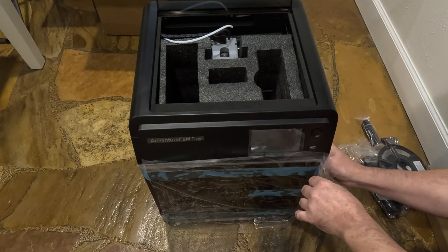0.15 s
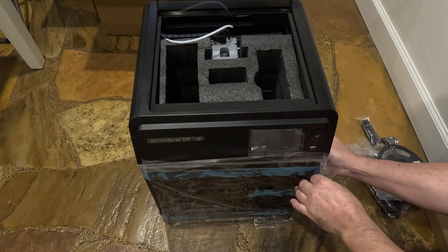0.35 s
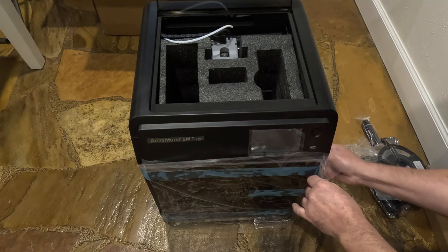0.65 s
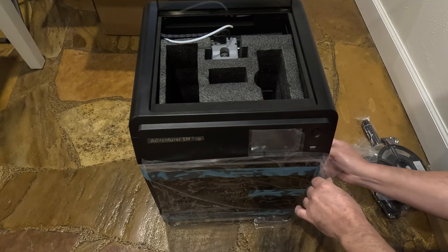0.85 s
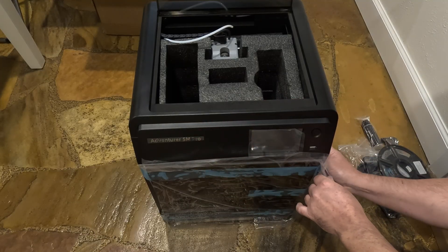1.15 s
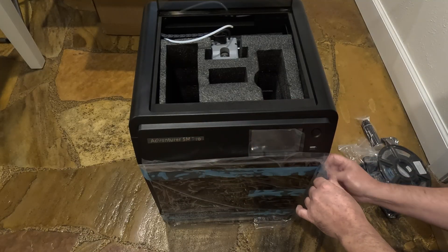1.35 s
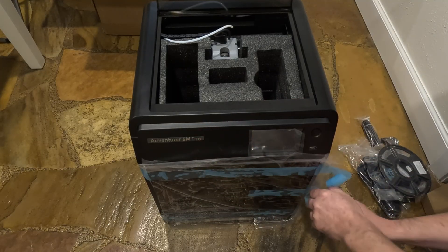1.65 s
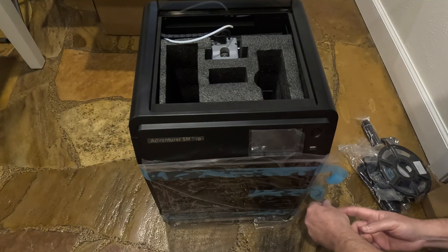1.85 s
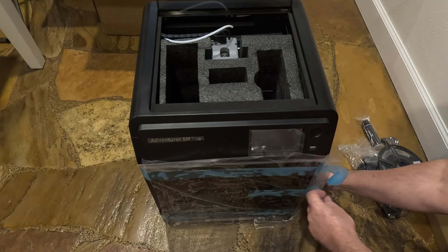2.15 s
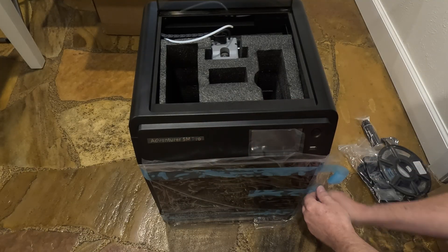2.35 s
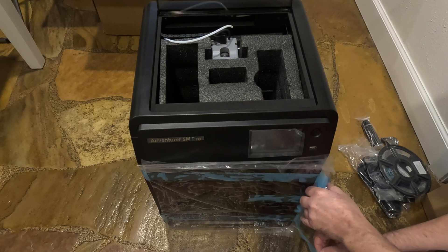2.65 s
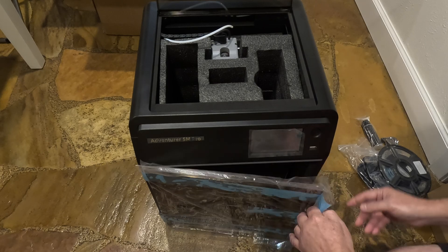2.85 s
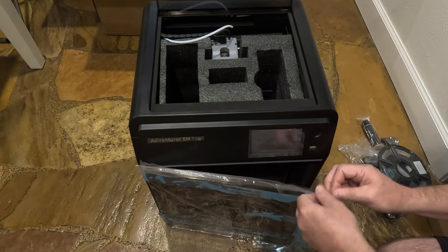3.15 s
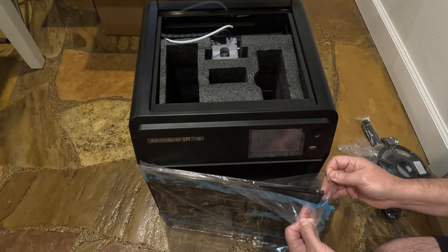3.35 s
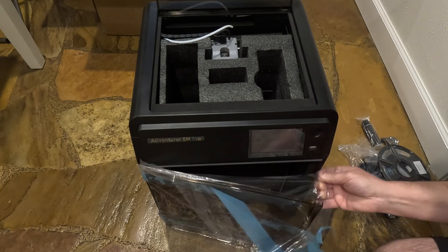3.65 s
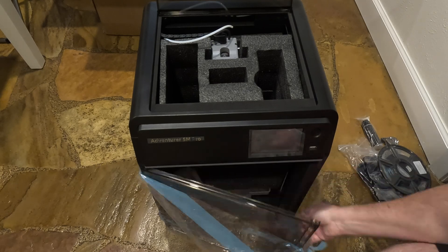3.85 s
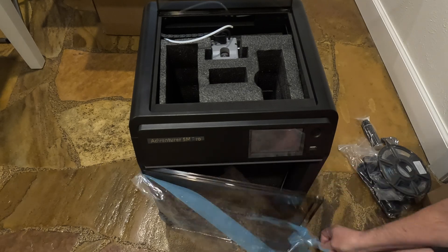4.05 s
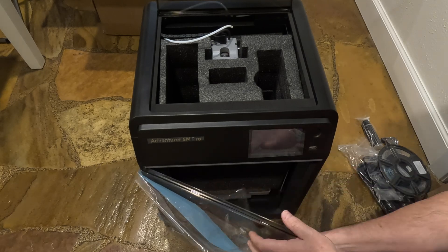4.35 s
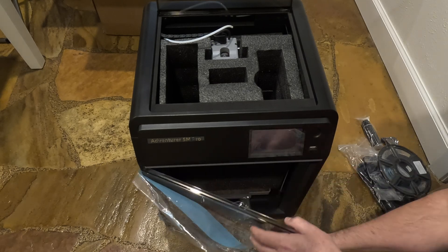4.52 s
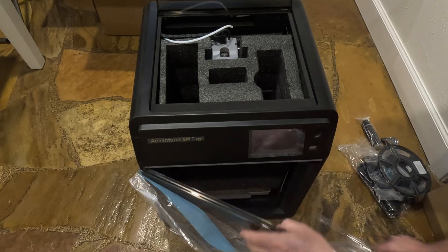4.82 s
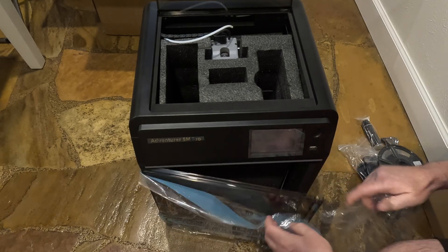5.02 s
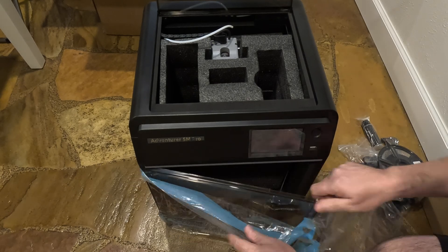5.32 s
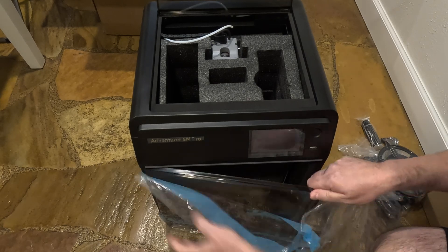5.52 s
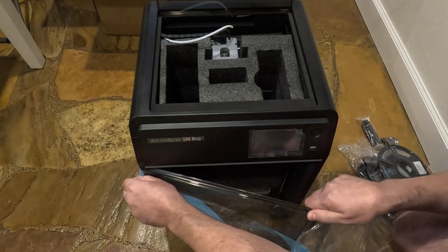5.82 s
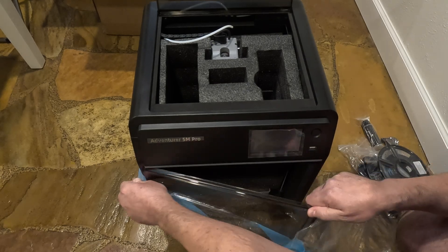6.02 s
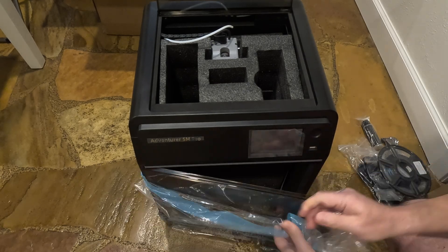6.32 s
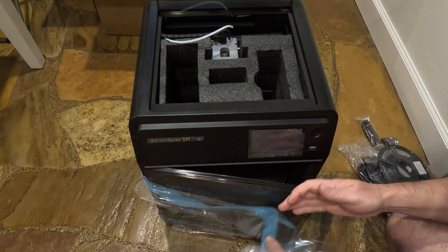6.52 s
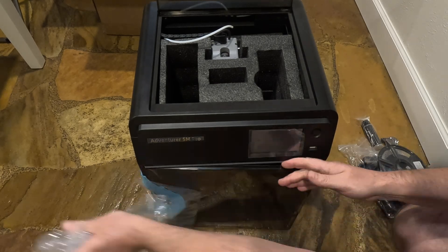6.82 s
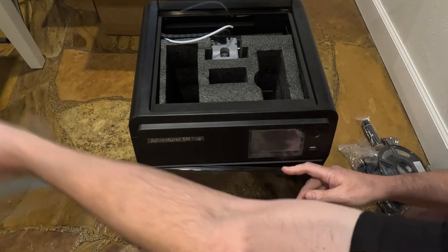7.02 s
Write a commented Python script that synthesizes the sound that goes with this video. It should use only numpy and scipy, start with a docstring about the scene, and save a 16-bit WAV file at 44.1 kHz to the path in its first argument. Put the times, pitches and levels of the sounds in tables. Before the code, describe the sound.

Crinkly plastic sheet crackles and snaps as hands tug it free from a hollow box indoors, quiet picking growing into loud rustling pulls.

```python
"""Clear plastic film, picked at its tape by two hands, is pulled off a hollow printer cabinet on a stone floor.
Film: dense small crease rings and fine hiss follow the pull; rips are filtered bursts of the same rustle.
Snaps are sharp filtered edges with flutter; two chirps are short tones.
The cabinet rings at its modes when bumped by fingers or shaken by the film.
Close reflections and faint room rumble surround it, heard by two close microphone ports."""
import sys
import numpy as np
from scipy import signal
from scipy.fft import rfft, irfft
from scipy.io import wavfile
from scipy.ndimage import uniform_filter1d

SR = 44100
rng = np.random.default_rng(int(sys.argv[2]) if len(sys.argv) > 2 else 0)


def generate_wav(sig):
    """Save sig (samples, or channels by samples) to the path in sys.argv[1] as 16-bit PCM at SR."""
    pcm = np.round(np.clip(np.atleast_2d(sig).T, -1, 1) * 32767).astype(np.int16)
    wavfile.write(sys.argv[1], SR, pcm)


N = 316544


def gain_of(db):
    """Amplitude factor of a level in dB."""
    return 10 ** (np.asarray(db) / 20)


def evened(x):
    """Scale to an RMS of one."""
    return x / np.sqrt(np.mean(x ** 2) + 1e-20)


def read(points, hz):
    """Interpolate a spectrum table over log frequency."""
    f, value = np.transpose(points)
    return np.interp(np.log(hz + 1), np.log(f + 1), value)


def add(mix, s, sound):
    """Mix a sound in place from s seconds on."""
    part = mix[round(s * SR):][:len(sound)]
    part += sound[:len(part)]


def smoothed(x, length):
    """Two moving averages, length in samples."""
    return uniform_filter1d(uniform_filter1d(x, length), length)


def high_pass(x, hz, order):
    """Butterworth high-pass."""
    return signal.sosfilt(signal.butter(order, hz, "high", fs=SR, output="sos"), x)


def colour(x, points, size=2048):
    """Causal filter of unit energy: the phase follows from the log gain."""
    db = np.maximum(read(points, abs(np.fft.fftfreq(size, 1 / SR))), -100)
    log_gain = db * np.log(10) / 20
    taps = np.fft.ifft(np.exp(np.conj(signal.hilbert(log_gain)))).real[:size // 2]
    return signal.oaconvolve(x, taps / np.linalg.norm(taps))[:len(x)]


def control(table, index):
    """One column of a curve at every sample."""
    rows = np.array(table)
    return np.interp(np.arange(N) / SR, rows[:, 0], rows[:, index])


def band(x, hz, width):
    """A broad two-pole hump around hz, width in parts of hz."""
    return signal.lfilter(*signal.iirpeak(np.clip(hz, 300, 12000), 1 / width, SR), x)


# Steady pull on the film, slack while picking, then hauled in strokes.
# Each row: time in seconds, rustle level in dB.
PULL_CURVE = [(0, -66), (1.25, -72.5), (2.13, -72), (2.56, -56.5), (2.92, -47), (3.13, -53.5), (3.18, -68),
              (3.22, -48.5), (3.84, -40.5), (4.15, -44.5), (4.37, -60.5), (4.46, -35), (4.62, -45.5),
              (4.68, -30.5), (4.85, -31.5), (4.89, -47), (5.55, -42.5), (5.62, -50.5), (5.68, -44.5),
              (5.98, -39), (6.23, -48.5), (6.3, -36.5), (6.69, -35), (6.71, -27), (6.96, -29.5),
              (7.04, -40), (7.18, -27)]
# The freed area grows from a tight corner to a loose sheet.
# Each row: time in seconds, thinness of the rustle (0-1), cabinet brightness in dB per octave,
# share of the pull that shakes the cabinet in dB.
SHEET_CURVE = [(0, 0.3, -0.2, -1), (2.2, 0.18, -5, -3.5), (3.2, 0, -1, -15), (7.18, 0, 0.6, -18.5)]
# Patches of glue or tape ripping free.
# Each row: start in seconds, length in seconds, level in dB, brightest Hz, shaking of the cabinet in dB.
RIP_EVENTS = [(0.0, 0.036, -46, 5000, -72), (0.059, 0.032, -31.5, 4570, -47.5),
              (0.156, 0.038, -41, 1000.0, -44), (0.258, 0.029, -47, 990, -42.5),
              (0.375, 0.01, -63, 900.0, -38), (0.419, 0.025, -36.5, 1180, -42),
              (0.509, 0.025, -55, 1000.0, -46.5), (0.572, 0.027, -52.5, 3000.0, -50),
              (0.638, 0.012, -39, 3000, -44), (0.654, 0.02, -28, 5900.0, -30),
              (0.689, 0.071, -56, 900, -45.5), (0.724, 0.03, -28, 5850, -45),
              (0.764, 0.042, -51, 4000, -74), (0.815, 0.014, -38.5, 7600.0, -70),
              (0.833, 0.027, -44, 3000, -70), (0.906, 0.041, -45.5, 4080, -81),
              (1.002, 0.015, -56, 900.0, -44.5), (1.066, 0.022, -50, 5000.0, -53),
              (1.101, 0.031, -46.5, 5000, -64), (1.137, 0.025, -38, 9000.0, -33.5),
              (1.265, 0.023, -47, 880, -45), (1.303, 0.078, -48.5, 4000, -45),
              (1.363, 0.025, -41, 7000.0, -44), (1.4, 0.048, -35.5, 5800.0, -46),
              (1.523, 0.041, -34.5, 2100, -37), (1.568, 0.046, -43, 4000, -64),
              (1.616, 0.012, -33.5, 5870, -39.5), (1.655, 0.03, -38, 4300, -37),
              (1.737, 0.04, -55.5, 4000, -59), (1.784, 0.027, -45.5, 3230, -52),
              (1.82, 0.062, -54.5, 6000, -62), (1.881, 0.011, -39, 2700.0, -43.5),
              (1.895, 0.048, -53.5, 4000, -69), (1.968, 0.025, -52, 6400.0, -78),
              (2.061, 0.02, -53, 1300.0, -57), (2.237, 0.012, -43.5, 6500.0, -38.5),
              (2.255, 0.045, -66, 900, -53), (2.285, 0.092, -60, 700.0, -40),
              (2.342, 0.037, -56, 3000, -55), (2.392, 0.025, -25, 5600.0, -36),
              (2.491, 0.019, -28, 4930, -40), (2.517, 0.024, -45.5, 4000, -44.5),
              (2.585, 0.044, -35.5, 3020, -45.5), (2.667, 0.076, -40.5, 3900, -60),
              (2.778, 0.022, -41, 1320, -71), (2.826, 0.02, -37.5, 3700.0, -67),
              (2.858, 0.049, -34, 2940, -42), (2.919, 0.034, -35.5, 3280, -47),
              (3.01, 0.076, -43, 3420, -54), (3.087, 0.018, -41, 6200.0, -48),
              (3.212, 0.018, -35, 3600.0, -62), (3.244, 0.061, -32, 3950, -51),
              (3.324, 0.089, -34.5, 2970, -46.5), (3.437, 0.026, -34, 7560, -51),
              (3.476, 0.03, -32.5, 7000.0, -54), (3.518, 0.023, -32, 7000.0, -51),
              (3.559, 0.047, -30, 3150, -53), (3.612, 0.044, -23, 3240, -37.5),
              (3.725, 0.039, -28.5, 3520, -43), (3.781, 0.044, -24.5, 5270, -44),
              (3.839, 0.075, -27, 3330, -42.5), (3.935, 0.032, -35.5, 5300.0, -54),
              (3.991, 0.018, -31.5, 2360, -40), (4.057, 0.02, -27, 4070, -41.5),
              (4.129, 0.026, -43, 3100.0, -64), (4.19, 0.032, -40, 3380, -49.5),
              (4.307, 0.031, -49.5, 3170, -65), (4.512, 0.074, -31.5, 3200, -51),
              (4.723, 0.06, -23, 3260, -42), (4.905, 0.043, -38, 1020, -61), (4.975, 0.076, -34, 1940, -55),
              (5.064, 0.031, -32.5, 2180, -54), (5.118, 0.067, -38, 3000, -48.5),
              (5.173, 0.027, -33, 1400, -40), (5.257, 0.053, -36, 3230, -44),
              (5.379, 0.053, -31, 2780, -46.5), (5.471, 0.058, -31.5, 3300.0, -43.5),
              (5.523, 0.044, -39.5, 2940, -48), (5.642, 0.044, -37.5, 1880, -53),
              (5.694, 0.045, -34.5, 3140, -55), (5.801, 0.038, -33.5, 3380, -50),
              (5.885, 0.0092, -40, 1090, -40), (5.971, 0.065, -28.5, 3480, -45.5),
              (6.119, 0.014, -33.5, 2700.0, -57), (6.179, 0.031, -32.5, 1220, -49),
              (6.288, 0.013, -46, 4000, -60), (6.466, 0.028, -25, 1200.0, -46),
              (6.611, 0.051, -29.5, 2820, -46), (7.054, 0.029, -20.5, 4470, -38),
              (7.09, 0.025, -30, 4500, -46), (7.168, 0.028, -23.5, 2000.0, -32)]
DULL_DB_PER_OCTAVE = 2  # a low, slack patch rips with less of the broad crackle


def film(width=2.43, broad_db=-4):
    """The rustle follows the pull; every rip is a burst of it, brightest where the free patch rings."""
    rustle = creases()
    thinness = np.clip(control(SHEET_CURVE, index=1), 0, 1)
    rustle = rustle - thinness * band(rustle, 2750, 1.0)  # a small patch radiates little mid range
    out = rustle * gain_of(control(PULL_CURVE, index=1))
    for s, length_s, db, hz, _ in RIP_EVENTS:
        shape = surge(length_s)
        at = round(s * SR) + 5000 + np.arange(len(shape))
        piece = rustle.take(at, 1, mode="wrap")
        crackle_db = broad_db + DULL_DB_PER_OCTAVE * np.log2(hz / 4000)
        ringing = band(band(piece, hz, width), hz, width)
        piece = evened(ringing) + gain_of(crackle_db) * evened(piece)
        piece /= np.sqrt(np.mean((shape * piece) ** 2) / np.mean(shape ** 2))
        for port in range(len(out)):
            add(out[port], s, gain_of(db) * shape * piece[port])
    return out


SETTLE_DB, SETTLE_T60_S = -14, 0.18  # after each rip the film settles with a fading rustle


def surge(length_s, rise=0.28, fall=0.49):
    """Quick swell, plateau, rounded end (rise, fall in parts of the length), then the film settling."""
    shortest_s = max(length_s, .005)
    t = np.arange(round((3 * shortest_s + .2) * SR)) / SR
    along = t / shortest_s
    end = np.exp(-np.maximum(along - .6, 0) ** 2 / fall ** 2)
    settling = gain_of(SETTLE_DB - 60 * np.maximum(t - length_s, 0) / SETTLE_T60_S)
    return (1 - np.exp(-along / rise)) * np.maximum(end, settling)


# Colour of the film at the microphone. Each row: frequency in Hz, density in dB per Hz.
FILM_COLOUR = [(290, -12), (500, -7.5), (853, -6), (1090, -2), (1210, -3), (1840, -5), (2450, -5.5),
               (2750, -4), (3000, -4), (7560, -5.5), (12200, -22), (15800, -42)]
# Very high hiss, independent in the two ports, its level changing over time.
# Each row: time in seconds, level in dB on the scale of hiss_db.
HIGH_HISS_CURVE = [(0, -1), (0.7, -6), (1.2, 3), (1.9, 2), (2.4, -7), (3.2, -5), (3.8, 5), (4.3, -12),
                   (5.6, -12), (6.1, 0.5), (6.8, 1.5), (7.18, -11)]
HIGH_HISS_HZ = 9800
SMOOTH_FROM_DB, SMOOTH_PER_DB = -33.5, 0.3  # a hard pull peels evenly: above this the clumps flatten


def creases(per_s=4200, spread_db=3.5, clump_db=4.0, hiss_db=-9, count=24):
    """Many tiny buckles, each a short damped ring of its own pitch and place; they come in clumps."""
    clumps = evened(smoothed(rng.standard_normal(N), 150))
    hard_db = np.maximum(control(PULL_CURVE, index=1) - SMOOTH_FROM_DB, 0)
    clump_level_db = clump_db * clumps * np.clip(1 - SMOOTH_PER_DB * hard_db, 0, 1)
    size = gain_of(spread_db * np.minimum(rng.exponential(1, N), 4) + clump_level_db)
    size *= rng.choice([-1., 1.], N) * (rng.random(N) < per_s / SR)
    kind = rng.integers(0, count, N)
    t, out = np.arange(400) / SR, np.zeros((2, N))
    for k, hz in enumerate(np.geomspace(600, 13000, count)):
        ring = np.sin(2 * np.pi * hz * t) * np.exp(-t * hz / 2.2)
        rung = signal.oaconvolve(size * (kind == k), ring * np.sqrt(hz) / np.linalg.norm(ring))[:N]
        out += rung * gain_of(rng.standard_normal() * np.array([[1], [-1]]))
    sliding = gain_of(hiss_db + clump_level_db) * rng.standard_normal(N)
    high_hiss = high_pass(rng.standard_normal((2, N)), HIGH_HISS_HZ, order=4)
    sliding = sliding + gain_of(control(HIGH_HISS_CURVE, index=1) + clump_level_db) * high_hiss
    return evened(np.array([colour(port, FILM_COLOUR) for port in evened(out) + sliding]))


# Single creases snapping through. Each row: time in seconds, peak in dB before port spread, brightest Hz.
SNAP_EVENTS = [(0.0489, -16, 6000), (0.073, -15, 6400), (0.18, -24.5, 7000), (0.248, -46, 8000),
               (0.295, -33.5, 6000), (0.4262, -22.5, 9000), (0.4385, -18, 1180), (0.6446, -13, 5960),
               (0.7299, -13, 6500.0), (0.8165, -22, 7800), (0.8385, -28, 4000), (0.849, -30, 3000),
               (1.0567, -21.5, 4770), (1.1569, -13.5, 9400), (1.2846, -27.5, 7800), (1.3813, -13.5, 6900),
               (1.442, -22, 6600.0), (1.529, -17, 4000.0), (1.552, -22, 2980), (1.621, -28, 4960),
               (1.795, -34, 5000), (1.886, -28, 3000), (2.2404, -22, 7700.0), (2.351, -34, 2500),
               (2.4025, -14, 5870), (2.4625, -25.5, 4500.0), (2.4957, -19, 4800.0), (2.5925, -10, 2740),
               (2.6631, -27, 2700), (2.7113, -23, 2780), (2.729, -20, 4230), (2.7529, -21.5, 6800.0),
               (3.0552, -17, 6700.0), (3.0943, -13, 6250), (3.138, -22, 4460), (3.1956, -27.5, 4200.0),
               (3.2555, -12.5, 3930), (3.3493, -17, 3220), (3.3958, -14, 6860), (3.4998, -19.5, 1320),
               (3.5275, -15, 7400), (3.541, -18, 5090), (3.5502, -13, 5200.0), (3.575, -14, 3020),
               (3.5912, -14.5, 2600.0), (3.6236, -9, 4800.0), (3.6405, -9, 3400.0), (3.669, -18, 10000),
               (3.6804, -18, 6800.0), (3.7252, -12, 2000.0), (3.7674, -16, 4700.0), (3.797, -12.5, 5600.0),
               (3.8175, -15, 9000), (3.83, -10, 10000), (3.8545, -9.5, 4100.0), (3.862, -14, 2500),
               (3.8797, -12.5, 5700.0), (4.0049, -10.5, 2210), (4.115, -20.5, 7700.0),
               (4.1612, -18.5, 3100.0), (4.195, -17, 3200.0), (4.21, -35, 5000), (4.255, -25.5, 1470),
               (4.312, -33, 5000), (4.331, -36, 2400), (4.3993, -30, 2680), (4.476, -26, 2000),
               (4.5313, -11.5, 3830), (4.5677, -13.5, 3500.0), (4.6714, -17, 3680), (4.739, -11, 3100),
               (4.7461, -9, 3230), (5.1885, -11.5, 1600), (5.213, -21, 3500), (5.2435, -17.5, 3200.0),
               (5.295, -20, 2600.0), (5.4714, -6.5, 6840), (5.495, -10.5, 2200.0), (5.7308, -15.5, 3160),
               (5.768, -27, 6400.0), (5.8878, -13, 1170), (5.9346, -7, 2800.0), (5.9986, -8.5, 3040),
               (6.045, -9.5, 3470), (6.094, -12.5, 3620), (6.1257, -13.5, 2810), (6.1796, -18.5, 1900.0),
               (6.19, -15.5, 7000), (6.293, -30, 2500), (6.3275, -15.5, 3600.0), (6.5515, -12.5, 3800.0),
               (6.585, -16.5, 8800), (6.603, -16, 4230), (6.6232, -12, 1700.0), (6.7523, -11, 6300.0),
               (6.9473, -13, 7400), (6.9635, -13.5, 10000), (6.976, -18, 7940), (7.102, -11.5, 4100),
               (7.1081, -10.5, 5060), (7.1368, -14, 7600.0), (7.1698, -8, 1235)]
SECOND_RING_DB, SECOND_RING_WIDTH = -7.5, 0.21  # each snap also rings a neighbouring patch of chance pitch


def snaps(width=0.31, broad_db=-5, t60_s=0.011, echo_s=.0017, echo_db=-7):
    """A crease flips over: a sharp edge, a few milliseconds of flutter, and the edge again off the floor."""
    out, t = np.zeros((2, N)), np.arange(900) / SR
    flips = SNAP_EVENTS + chance_snaps()
    noise = rng.standard_normal((len(flips), len(t) + 2))
    edge = np.zeros(len(t))
    edge[0], edge[round(echo_s * SR)] = 1, gain_of(echo_db)
    for (s, db, hz), (place, pitch, *flutter) in zip(flips, noise):
        kick = 0.15 * np.array(flutter) * gain_of(-60 * t / t60_s) + np.sign(place) * edge
        kick = band(colour(kick, FILM_COLOUR), 5370, 4.1)
        sound = evened(band(kick, hz, width)) + gain_of(broad_db) * evened(kick)
        second_ring = band(kick, 4500 * 1.6 ** pitch, SECOND_RING_WIDTH)
        sound += gain_of(SECOND_RING_DB) * evened(second_ring)
        for port, sign in enumerate((1, -1)):
            add(out[port], s, gain_of(db + 1.0 * sign * place) * sound / abs(sound).max())
    return out


CHANCE_PER_S, CHANCE_OVER_DB, CHANCE_SPREAD_DB = 8, 14.5, 11  # small snaps, level above the pull curve


def chance_snaps():
    """Small creases flip at random moments and pitches, louder under a harder pull."""
    wait, size, pitch = rng.random((150, 3)).T
    s = np.cumsum(-np.log(1 - wait)) / CHANCE_PER_S
    db = np.interp(s, *np.transpose(PULL_CURVE)) + CHANCE_OVER_DB + CHANCE_SPREAD_DB * size ** 2
    hz = 2000 * 4 ** pitch
    return [row for row in zip(s, db, hz) if row[0] < N / SR]


# A taut patch sings briefly. Each row: start in seconds, peak in dB, pitch in Hz.
CHIRP_EVENTS = [(6.655, -21.5, 2780), (7.012, -25, 5500)]
CHIRP_S = .009


def chirps():
    """A few milliseconds of nearly pure tone that swells and fades."""
    out, t = np.zeros(N), np.arange(round(CHIRP_S * SR)) / SR
    for s, db, hz in CHIRP_EVENTS:
        add(out, s, gain_of(db) * np.hanning(len(t)) * np.sin(2 * np.pi * hz * t))
    return out


# Bumps against the cabinet.
# Each row: time in seconds, peak in dB before the bass cut, pitch of the struck panel in Hz.
BUMP_EVENTS = [(0.167, -29.5, 191), (0.315, -25.5, 172), (0.379, -24.5, 180), (0.426, -24, 186),
               (0.663, -21, 186), (1.071, -30.5, 190), (1.12, -23, 195), (1.148, -25, 250),
               (1.159, -28, 296), (1.545, -27.5, 158), (1.663, -32, 250), (2.242, -35, 191),
               (3.289, -27.5, 220), (3.633, -30, 161), (3.741, -29.5, 288), (3.856, -31, 143),
               (4.001, -32.5, 312), (5.187, -12, 310), (5.204, -23, 250), (5.765, -32.5, 400),
               (5.819, -30, 388), (5.884, -30.5, 242), (6.365, -30.5, 332), (7.061, -19, 310)]
# Modes of the hollow box. Each row: frequency in Hz, relative level in dB, t60 when struck in seconds.
CABINET_MODES = [(120, -10, 0.02), (186, 3, 0.059), (312.4, 0, 0.052), (389, -0.5, 0.048),
                 (539.5, 1.5, 0.041), (663, 0.5, 0.04), (860, 0, 0.038), (1062, 3.5, 0.041),
                 (1430, 0, 0.039), (1930, -0.5, 0.028)]


def cabinet(contact_s=0.00055, focus_db=7):
    """The hollow box rings at its modes: struck by each bump, and shaken by the pull and the rips."""
    out, t = np.zeros(N), np.arange(7000) / SR
    push = np.hanning(round(contact_s * SR) + 3)
    detune = 1 + .03 * rng.standard_normal((len(BUMP_EVENTS), len(CABINET_MODES)))
    for (s, db, struck_hz), factors in zip(BUMP_EVENTS, detune):
        ring = np.zeros(len(t))
        for (hz, mode_db, t60_s), factor in zip(CABINET_MODES, factors):
            off_db = focus_db * abs(np.log2(hz / struck_hz))  # modes far from the struck panel ring less
            level_db = mode_db - off_db + 2.26 * rng.standard_normal()
            ring += gain_of(level_db - 60 * t / t60_s) * np.sin(2 * np.pi * hz * factor * t)
        ring = np.convolve(ring * (1 - np.exp(-t / 0.002)), push)
        add(out, s, gain_of(db) * ring / abs(ring).max())

    shaking = gain_of(control(PULL_CURVE, index=1) + control(SHEET_CURVE, index=3))
    for s, length_s, _, _, shake_db in RIP_EVENTS:
        add(shaking, s, gain_of(shake_db) * surge(length_s))
    tugs = shaking * evened(rng.standard_normal(N) * (rng.random(N) < 2500 / SR))
    # shaken modes die in 0.24 of the struck t60
    modes = [gain_of(db - 60 * t / (0.24 * t60_s)) * np.sin(2 * np.pi * hz * t)
             for hz, db, t60_s in CABINET_MODES]
    for (hz, _, _), mode in zip(CABINET_MODES, modes):
        tilted = tugs * gain_of(control(SHEET_CURVE, index=2) * np.log2(hz / 280))
        out += signal.oaconvolve(tilted, mode / np.linalg.norm(modes))[:N]
    return high_pass(out, 110, order=2)  # small panels radiate no deep bass


def room(x, t60_s=0.068, size=2600):
    """Close reflections off floor, wall and cabinet: sparse taps of random sign, other ones for each port.
    Each short stretch gets freshly drawn taps, so the tail stays diffuse and untuned."""
    window = np.sin(np.pi * np.arange(2 * size) / (2 * size))
    out = np.zeros((2, N + 9 * size))
    padded = np.pad(x, ((0, 0), (size, 2 * size)))
    for start in range(0, N + size, size):
        at = np.arange(40, 5980, 20) + rng.integers(0, 20, (2, 297))
        taps = np.zeros((2, 6000))
        heights = rng.choice([-1., 1.], at.shape) * gain_of(-60 * at / SR / t60_s)
        np.put_along_axis(taps, at, heights, 1)
        taps = signal.lfilter([1, -.97], [1, -.8], taps)  # thins the bass of the tail
        stretch = window * padded[:, start:start + 2 * size]
        echo = signal.fftconvolve(stretch, taps / np.linalg.norm(taps[0]), axes=1)
        out[:, start:start + echo.shape[1]] += echo
    return out[:, size:size + N]


# Spectrum of the room air. Each row: frequency in Hz, relative density in dB per Hz.
AIR_COLOUR = [(8.8, -29), (15, 45), (372, 12), (877, -17), (1030, -3), (2180, -3), (7460, -9.5),
              (9000, -31.5), (11700, -37), (19800, -120)]
# Level of the room air before its wander. Each row: time in seconds, level in dB.
AIR_LEVEL = [(0, -52.5), (1.2, -51.5), (1.9, -47.5), (2.4, -55), (7.18, -60)]


def air():
    """Faint low rumble and hush of the room, wandering in level, nearly the same in both ports."""
    shared, apart, drift = rng.standard_normal((3, N))
    hz = np.fft.rfftfreq(N, 1 / SR)
    pair = rfft([shared + .08 * apart, shared - .08 * apart])
    pair = irfft(pair * gain_of(read(AIR_COLOUR, hz)), N)
    wander = evened(smoothed(drift, 3000))
    return gain_of(control(AIR_LEVEL, index=1) + 2.0 * wander) * evened(pair)


# the highest treble gets a stronger share of the diffuse, port-different tail
TREBLE_TAIL_HZ, TREBLE_TAIL_DB = 11100, 4.5


def scene():
    """Film and cabinet heard directly, their close reflections, and the room air."""
    plastic = film() + snaps() + chirps()
    box = cabinet()
    treble = high_pass(plastic, TREBLE_TAIL_HZ, order=4)
    reflected = gain_of(-4.0) * plastic + gain_of(TREBLE_TAIL_DB) * treble + gain_of(-1.0) * box
    return plastic + box + room(reflected) + air()


# Level difference of the ports. Each row: frequency in Hz, left over right in dB.
PORT_LEAN = [(500, 0), (5000, -0.4), (8000, 1), (14000, 6.5)]
# Phase difference of the ports. Each row: frequency in Hz, lag of the left port in radians.
PORT_LAG = [(300, 0), (2900, .65), (5700, .12), (12000, .3)]
EDGE_HZ = 15950


def record(dry):
    """The left port hears slightly later and brighter; then the band limit."""
    hz, half = np.fft.rfftfreq(N, 1 / SR), np.array([[.5], [-.5]])
    lean = gain_of(read(PORT_LEAN, hz) * half)
    lag = np.exp(-1j * read(PORT_LAG, hz) * half)
    ports = irfft(rfft(dry) * lean * lag, N)
    low_pass = signal.firwin(511, EDGE_HZ, window=("kaiser", 9), fs=SR)
    return signal.oaconvolve(ports, low_pass[None], "same")


dry = scene()
out = record(dry)
generate_wav(out)
```